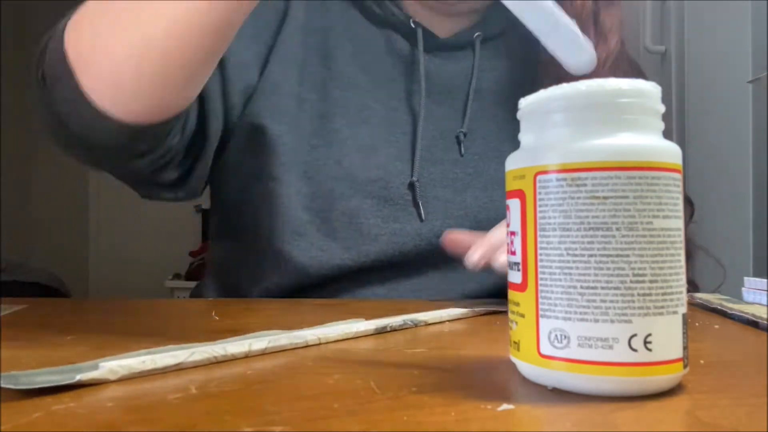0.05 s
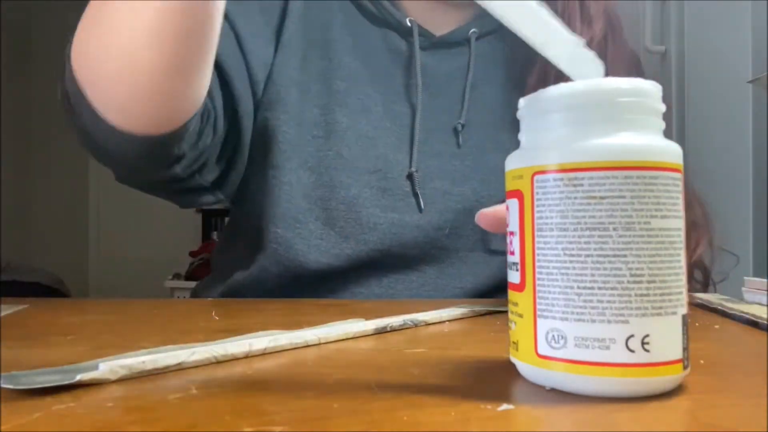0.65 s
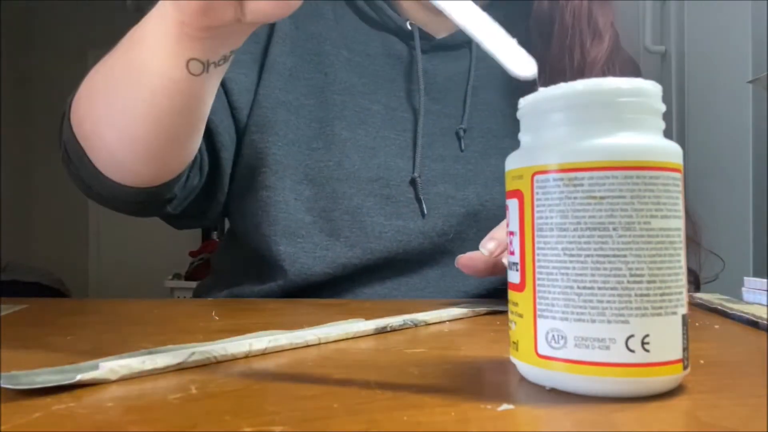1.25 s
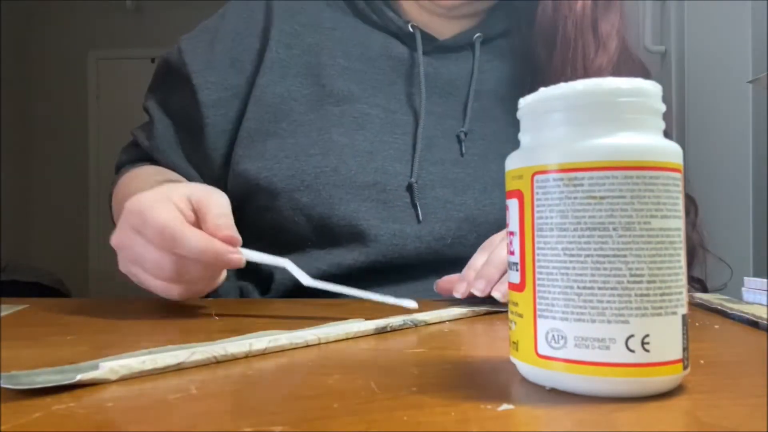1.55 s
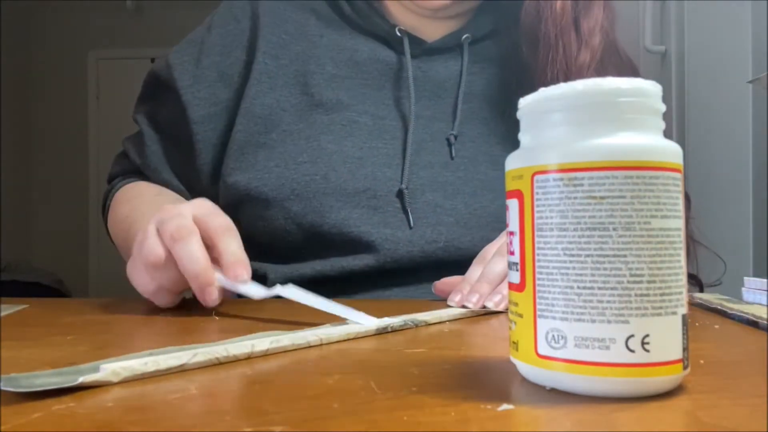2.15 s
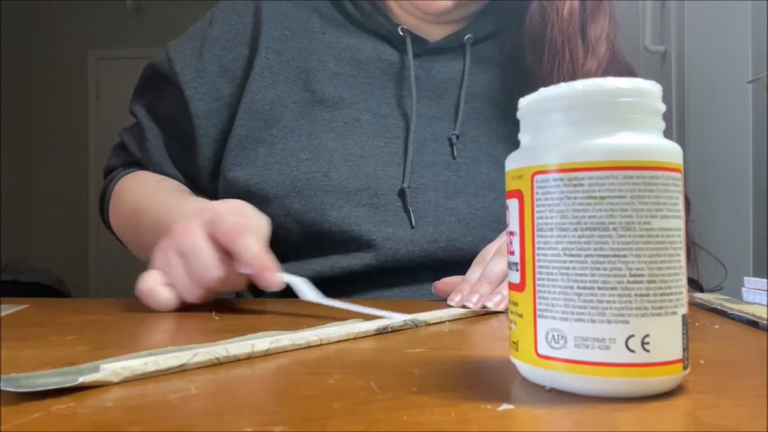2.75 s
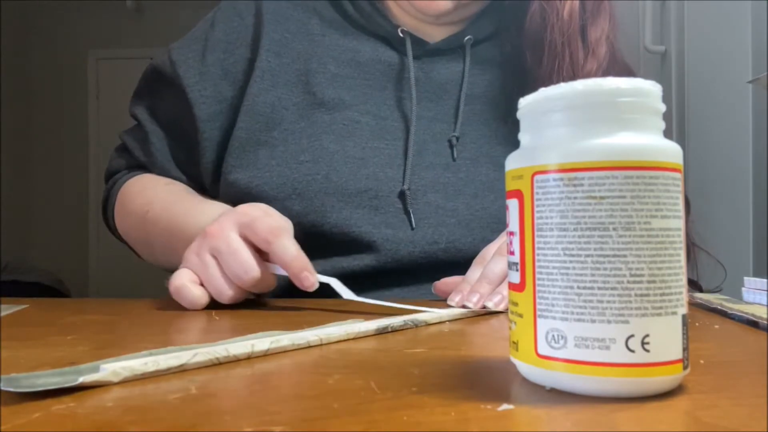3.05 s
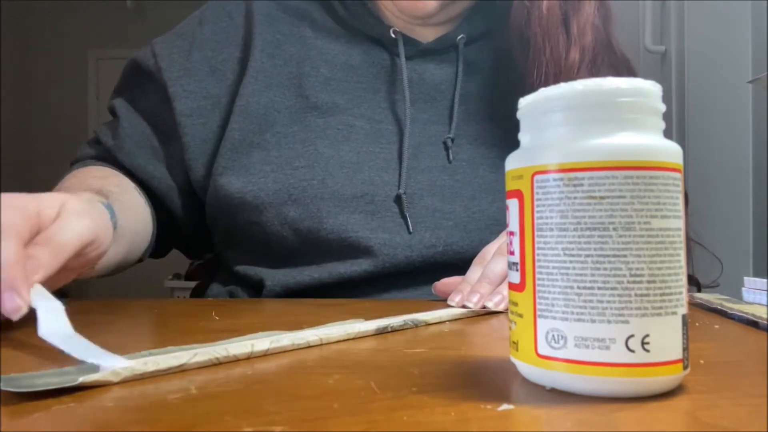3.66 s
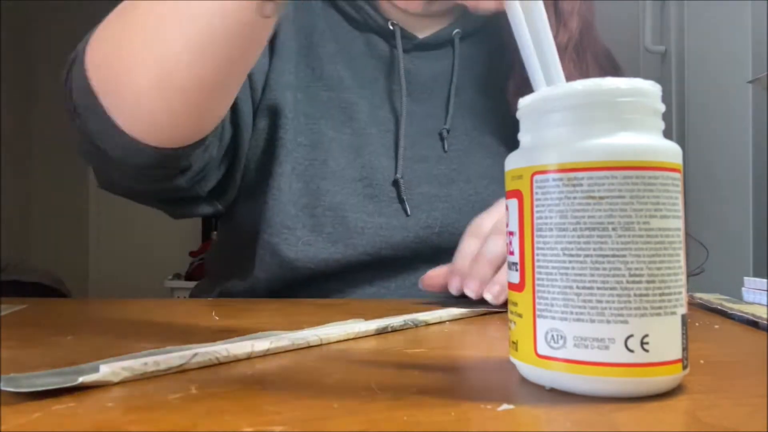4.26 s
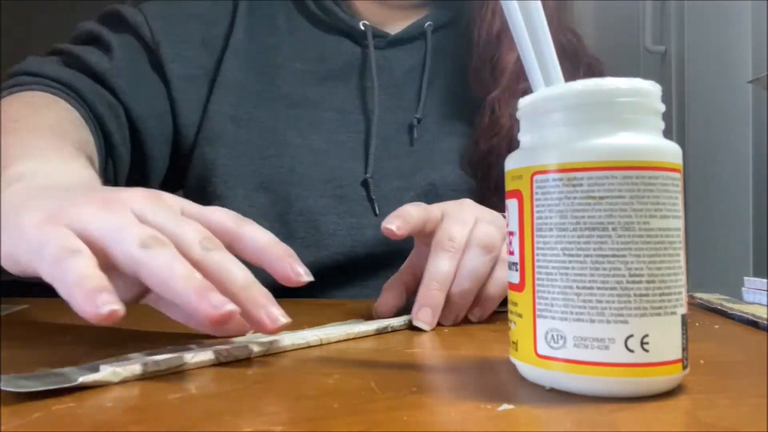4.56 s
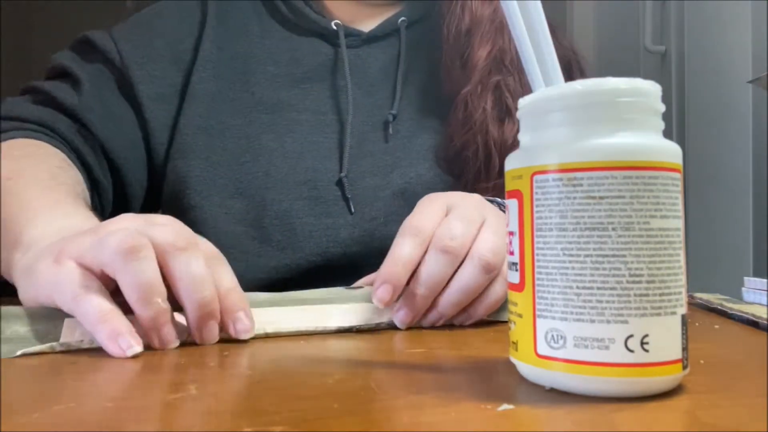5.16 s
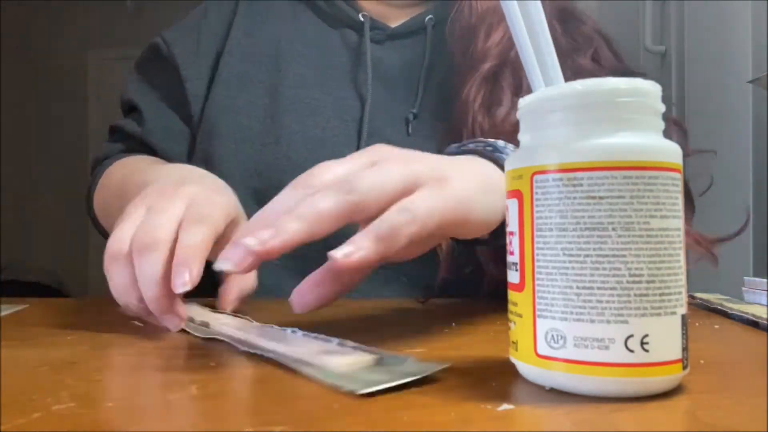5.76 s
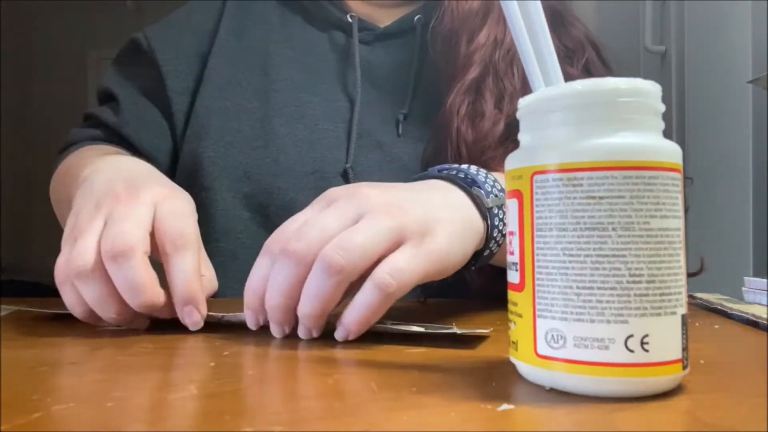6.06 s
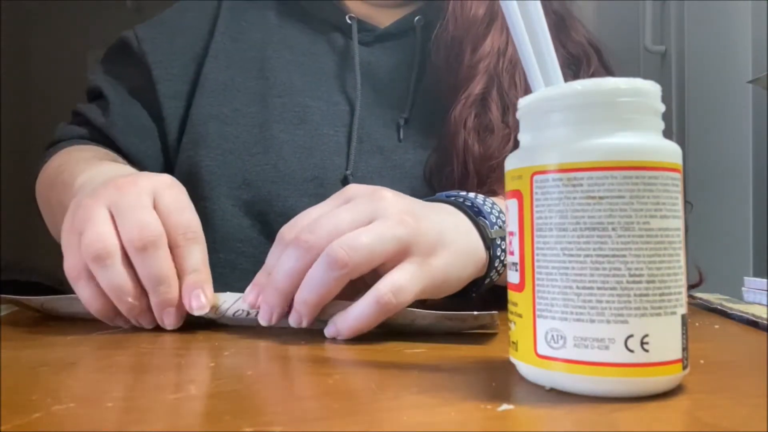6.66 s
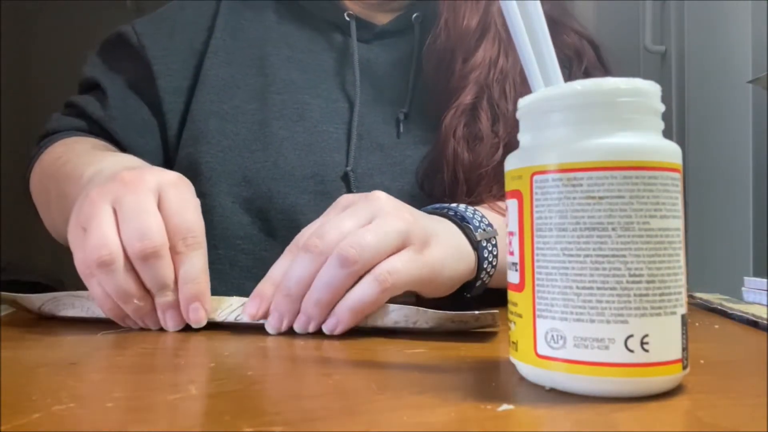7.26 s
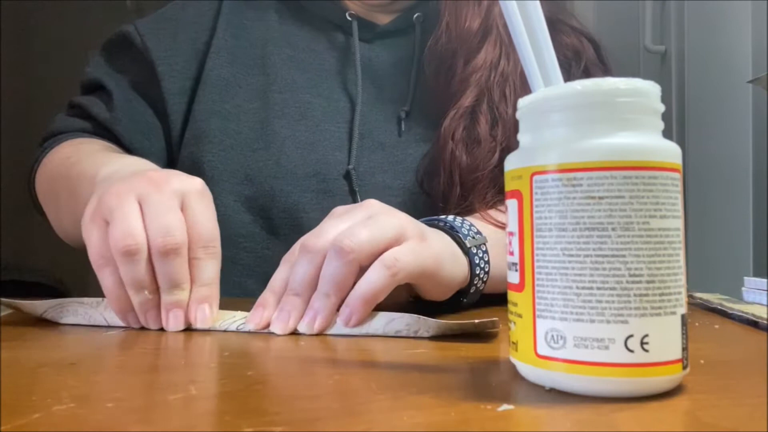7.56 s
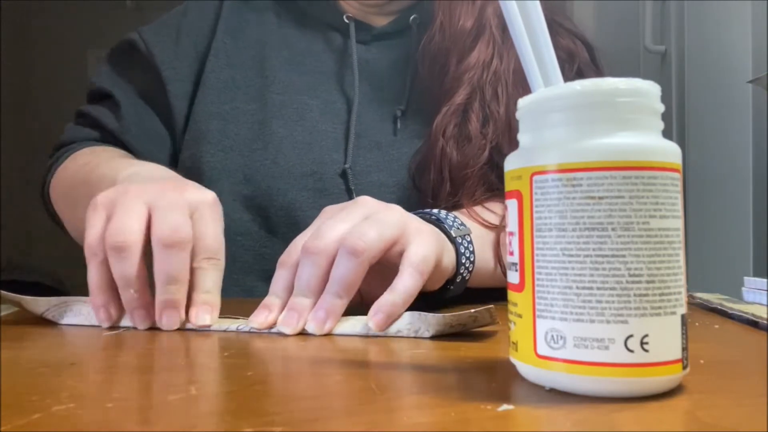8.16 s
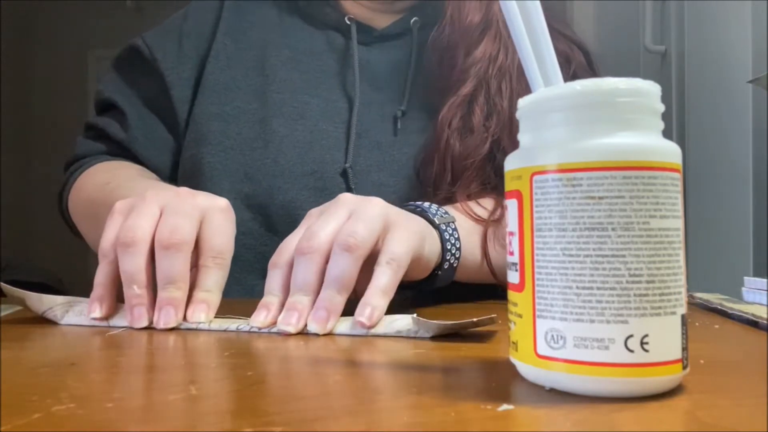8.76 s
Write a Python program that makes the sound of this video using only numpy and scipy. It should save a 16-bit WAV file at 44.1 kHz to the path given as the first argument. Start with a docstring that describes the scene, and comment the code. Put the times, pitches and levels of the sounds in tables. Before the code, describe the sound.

Small, close sounds at a table in a very quiet room with a faint low rumble. At about 0.4 seconds a spreader knocks lightly against a plastic glue jar, slightly to the right. From 2 to 4 seconds it dabs and scrapes along a wooden stick in a run of faint ticks and soft rubs. A louder cluster of jar knocks comes at about 4.2 seconds. From 4.6 seconds fingers handle the stick and press paper onto it, with soft table thuds, wooden taps, short crinkles and grainy, hissing rubs, busiest between 5 and 6.3 seconds. A faint low tone wavers from about 6.7 to 7.1 seconds. A firm thud lands at 7.3 seconds and a sharp tap, the most prominent, at 7.7. Dull presses and a crisp paper rustle follow around 8.4 to 8.6 seconds. Tiny, faint chirps ring now and then.

```python
"""At a table in a very quiet room, close up, glue is dabbed from a plastic jar onto a wooden stick, then paper
is pressed and smoothed onto it by hand. Each touch is a short grainy burst: tiny slips excite the normal modes
of the table top and of the stick or jar, and make the paper rasp and hiss. Every burst swells in and fades out
evenly. Between the touches the fingers keep rubbing. Faint chirps ring now and then, and a low tone wavers
briefly while the fingers press down."""
import sys
import numpy as np
from scipy import signal
from scipy.fft import rfft, irfft, next_fast_len
from scipy.io import wavfile

SR = 44100
rng = np.random.default_rng(int(sys.argv[2]) if len(sys.argv) > 2 else 0)


def generate_wav(signal):
    """Clip the signal to [-1, 1] and save it as 16-bit WAV at the path in sys.argv[1]."""
    frames = np.transpose(np.atleast_2d(signal))
    scaled = np.clip(frames, -1, 1) * 32767
    pcm = np.round(scaled).astype(np.int16)
    wavfile.write(sys.argv[1], SR, pcm)


N = 388962
TIME = np.arange(N) / SR
BODY_LEAD_S = 0.001   # thud and knock crest this long before the surface noise


def from_db(db):
    """Amplitude ratio of a level in decibels."""
    return np.exp(np.asarray(db) * (np.log(10) / 20))


def columns_at(rows, x):
    """Linear interpolation of each column against the first."""
    first, *columns = np.transpose(rows)
    return [np.interp(x, first, c) for c in columns]


def over_hz(rows, hz):
    """Interpolation of each column on a logarithmic frequency axis."""
    first, *columns = np.transpose(rows)
    return [np.interp(np.log(hz + 1), np.log(first), c) for c in columns]


def broad(spectrum):
    """Broadband response with a third-order roll-off below its lowest point."""
    return lambda hz: from_db(over_hz(spectrum, hz)[0]) * np.minimum(hz / spectrum[0][0], 1) ** 3


def ringing(modes, top_hz, scatter_db):
    """Modal superposition: each contact point weights the modes anew; soft skin mutes the top."""
    gains = from_db(np.array(modes)[:, 2] + scatter_db * rng.standard_normal(len(modes)))
    def response(hz):
        resonances = sum(gain * 1j * hz * width / (f * f - hz * hz + 1j * hz * width)
                         for (f, width, _), gain in zip(modes, gains))
        radiation = (hz / (modes[0][0] - modes[0][1])) ** 4   # weak below the lowest mode
        return resonances / np.sqrt(1 + (hz / top_hz) ** 12) * radiation / np.hypot(radiation, 1)
    return response


def stressed(response, centre_hz, lift_db, octaves):
    """Selective excitation: the place and hardness of a contact favour one frequency band."""
    return lambda hz: response(hz) * from_db(
        lift_db * np.exp(-(np.log2((hz + 1) / centre_hz) / octaves) ** 2))


def creased(response, ripple_db, count=170):
    """High modal density: a sheet's close resonances ripple its spectrum differently with each grip."""
    frequencies = np.geomspace(800, 16000, count)
    heights_db = ripple_db * rng.standard_normal(count)
    return lambda hz: response(hz) * from_db(np.interp(hz, frequencies, heights_db))


# Stereo image, by frequency:
# (frequency [Hz], coherence [0-1], phase lead of left [rad], left minus right [dB])
STEREO_IMAGE = [(88, 0.94, -0.3, 0), (140, 1, 2, 1), (260, 0.6, 0.82, -2), (445, 0.07, -0.24, -0.5),
                (666, 0.41, -1.5, -3.5), (916, 0, -1, -1.5), (1360, 0, 1.6, -0.5), (2600, 1, 0.5, 1.5),
                (4500, 0.6, 0.5, 1), (5740, 0.25, 2.5, -2.5), (7470, 0.88, -0.5, -0.5),
                (11200, 0.37, 4, 0.5), (12660, 0.92, 5.5, 0), (17100, 0.7, 13, -2)]

def in_stereo(force, response, lag_s=0, in_step_hz=250):
    """Partial coherence: two independent forces, filtered, form the sum and difference of the channels."""
    size = next_fast_len(force.shape[1])
    hz = np.arange(size // 2 + 1) * SR / size
    common, opposed = rfft(force, size) * response(hz)
    coherence, phase, pan_db = over_hz(STEREO_IMAGE, hz)
    coherence = np.clip(coherence, 0, .995)
    sides = np.array([[1], [-1]])
    pair = np.sqrt(1 + coherence) * common + sides * np.sqrt(1 - coherence) * opposed
    phase = phase * np.minimum(hz / in_step_hz, 1) ** 2   # left and right come into step in the bass
    left = np.exp(.5j * (phase - 2 * np.pi * hz * lag_s)) * from_db(pan_db / 2)
    return irfft(pair * np.array([left, 1 / left]), size)[:, :force.shape[1]]


def friction(envelope, response, lag_s=0, slips_per_s=900, slip_db=-2.5, smooth=0.32):
    """Stick-slip friction: fibres catch and let go over sliding noise; the envelope sets the energy."""
    shape = (2, len(envelope))
    sizes = from_db(slip_db * np.minimum(rng.exponential(1, shape[1]), 4))
    slips = (rng.random(shape[1]) < slips_per_s / SR) * sizes
    force = envelope * (slips + smooth) * rng.standard_normal(shape)
    sound = in_stereo(force, response, lag_s)
    return sound * np.sqrt(2 * np.sum(envelope ** 2) / (np.sum(sound ** 2) + 1e-30))


def add_burst(out, s, swell_s, db, response, lag_s=0, pan_db=0, crest_s=0.0018, size=8192):
    """Symmetric envelope: a short grainy burst fades in and out evenly around time s."""
    offset = np.arange(size) - size // 2
    envelope = from_db(db) * np.exp(-(np.hypot(offset / SR, crest_s) - crest_s) / max(swell_s, .002))
    sound = friction(envelope, response, lag_s) * from_db([[pan_db / 2], [-pan_db / 2]])
    at = offset + round(s * SR)
    inside = (at >= 0) & (at < N)
    out[:, at[inside]] += sound[:, inside]


# Spectrum of the room's background: (frequency [Hz], relative level [dB])
ROOM_SPECTRUM = [(20, -20), (40, -7.5), (62, 4.5), (100, -14.5), (160, -21.5), (250, -29), (500, -30),
                 (1000, -42.5), (3000, -45), (8000, -47.5), (15000, -49)]

def room(level_db=-69):
    """Ambient noise: a faint random rumble with most of its energy at low frequencies."""
    air = in_stereo(rng.standard_normal((2, N)), broad(ROOM_SPECTRUM))
    return from_db(level_db) * air / np.std(air)


# Spectrum of the rasp: (frequency [Hz], relative level [dB])
RASP_SPECTRUM = [(900, -36.5), (1300, -5.5), (1700, 1), (2400, -1.5), (3200, -1), (4100, -8.5),
                 (5500, -31.5)]

def rasping(centre_hz, ripple_db, lift_db, octaves):
    """Mid-band friction response: the surface's dense resonances, lifted around one frequency."""
    return stressed(creased(broad(RASP_SPECTRUM), ripple_db), centre_hz, lift_db, octaves)


# Spectrum of the hiss: (frequency [Hz], relative level [dB])
HISS_SPECTRUM = [(3000, -14.5), (4300, -2.5), (5300, -2.5), (6300, -1.5), (8000, -3.5), (9500, -5.5),
                 (12500, -7.5), (15000, -10), (16000, -38.5)]

def hissing(s, dull_db, ripple_db, duller_from_s=3.8):
    """High-band friction response: the hiss has less top treble from duller_from_s on."""
    crisp_db = 1.5 if s < duller_from_s else -2.5
    return stressed(creased(broad(HISS_SPECTRUM), ripple_db), 15200, crisp_db - dull_db, octaves=0.35)


# Rumble of the table under leaning arms: (time [s], level [dB])
LEANING = [(0, -85), (0.28, -73.5), (0.7, -79.5), (1.7, -86.5), (2.14, -66.5), (2.34, -84.5), (2.85, -69),
           (3.1, -82), (3.6, -67.5), (4.47, -90), (4.95, -54.5), (5.4, -69), (5.95, -48), (6.5, -73.5),
           (7.2, -62.5), (7.95, -60.5), (8.36, -44.5), (8.54, -64), (8.82, -66)]
# Sliding strokes: (start [s], end [s], rasp level at start [dB], rasp level at end [dB],
# stick level re rasp [dB], hiss level re rasp [dB])
STROKES = [(0.14, 0.34, -94.5, -94.5, 16.5, 6), (0.50, 0.622, -114, -100, 7, 18.5),
           (1.45, 1.542, -83, -92, 0.5, 2.5), (1.71, 1.776, -94.5, -89, 17, 7.5),
           (2.484, 2.526, -75, -74, 9.5, -1.5), (2.75, 2.918, -83, -73.5, 11.5, 2.5),
           (3.366, 3.61, -90, -90, 17.5, -5), (3.714, 3.946, -84, -89, 9, -10),
           (4.254, 4.381, -81.5, -99.5, 27.5, 5.5), (4.567, 4.805, -71.5, -76, 15, 2.5),
           (4.858, 5.045, -59.5, -71.5, 5, -2.5), (5.082, 5.227, -66.5, -65, 9, -6),
           (5.33, 5.508, -58.5, -59, 6.5, -3.5), (5.496, 5.61, -65, -64.5, 13, 3.5),
           (5.66, 5.73, -77, -80, 13, -4), (5.763, 6.034, -61, -57, 3.5, 0.5),
           (6.082, 6.362, -67.5, -66, 10, -5), (6.417, 6.485, -67, -71, 3.5, -9),
           (6.513, 6.584, -53.5, -55.5, -9.5, -10), (6.642, 6.742, -65.5, -82, 9.5, -8),
           (6.87, 7.114, -90.5, -76.5, 1, -6.5), (7.209, 7.329, -69.5, -70.5, 3, -3.5),
           (7.54, 7.661, -91.5, -66.5, 11.5, 0), (7.805, 7.923, -82.5, -85.5, 17, 0),
           (8.052, 8.404, -77.5, -58.5, 10.5, 2.5), (8.552, 8.658, -73, -75.5, 15.5, 3),
           (8.77, 8.82, -83, -69.5, 2.5, -3.5)]

def stroke_drive(attack_s=0.017, release_s=0.024, uneven_db=1.5, uneven_per_s=38, count=4000):
    """Incoherent addition: leaning and strokes sum in power to drive table, stick, rasp and hiss."""
    t = np.linspace(0, TIME[-1], count)
    lean_db, = columns_at(LEANING, t)
    power = np.zeros((4, count))
    power[:2] = from_db([lean_db, lean_db - 12.5]) ** 2   # the table passes a share on to the stick
    for start, end, first_db, last_db, stick_db, hiss_db in STROKES:
        gate = np.exp(-np.maximum(start - t, 0) / attack_s - np.maximum(t - end, 0) / release_s)
        effort = gate * from_db(np.interp(t, [start, end], [first_db, last_db]))
        table_db = stick_db + 1.5
        power += np.outer(from_db([table_db, stick_db, 0, hiss_db]), effort) ** 2
    # the sliding grip keeps catching and easing
    grip_db = uneven_db * np.interp(t * uneven_per_s, np.arange(count), rng.standard_normal(count))
    return np.array([np.interp(TIME, t, from_db(grip_db) * np.sqrt(p)) for p in power])


# Normal modes of the table top and of the stick: (frequency [Hz], bandwidth [Hz], relative level [dB])
TABLE_MODES = [(76.9, 27, 10), (101.6, 15, 10), (120.8, 33, 10.5), (159, 44, -35)]
STICK_MODES = [(246.2, 22.2, 6), (346.8, 67, -3), (438, 27.7, -2.5), (553, 42, -9.5), (627, 24.5, -6.5),
               (762, 16.6, -10), (856, 51, -12), (918, 20, -16.5), (1080.5, 41, -11.5), (1327, 87, -19),
               (1452, 16, -18.5)]
# Centre of the rasp, set by the length of surface free to move: (time [s], frequency [Hz])
RASP_CENTRE = [(0.4, 2210), (2.5, 2100), (2.88, 1690), (3.2, 1690), (3.55, 2340), (3.72, 1750),
               (4.17, 2360), (4.57, 2270), (5.05, 2630), (5.59, 2170), (5.87, 2800), (6.07, 2070),
               (6.25, 2450), (6.7, 2480), (7.43, 2280), (8.12, 2010), (8.45, 2330), (8.65, 3000)]

def rubbing(wander_s=.00006, size=8192):
    """Forced vibration: sliding fingers and spreader drive table, stick and paper, grip after grip."""
    out = np.zeros((2, N + size))
    drives = np.pad(stroke_drive(), ((0, 0), (0, size)))
    blend = np.sin(np.pi * np.arange(size) / size)   # overlapping grips cross-fade at equal power
    for start in range(0, N, size // 2):
        grip = slice(start, start + size)
        place_s = wander_s * rng.standard_normal()
        s = (start + size / 2) / SR
        rasp_hz, = columns_at(RASP_CENTRE, s)
        table = ringing(TABLE_MODES, top_hz=178.5, scatter_db=4.5)
        stick = ringing(STICK_MODES, top_hz=1350, scatter_db=5.0)
        rasp = rasping(rasp_hz, ripple_db=4.0, lift_db=6.5, octaves=0.25)
        hiss = hissing(s, dull_db=0, ripple_db=4.5)
        for drive, path, lag_s in zip(drives, (table, stick, rasp, hiss), (0, place_s, place_s, 0)):
            envelope = blend * drive[grip]
            out[:, grip] += friction(envelope, path, lag_s, slips_per_s=400, slip_db=3.5, smooth=0.4)
    return out[:, :N]


# Crisp rustles of paper and cloth:
# (time [s], swell time [s], rasp level [dB], hiss level re rasp [dB], rasp centre [Hz])
CRINKLES = [(0.111, 0.022, -80, 11, 2980), (2.315, .015, -94, 11.5, 3580), (4.661, 0.012, -63.5, -1, 1600),
            (4.785, 0.025, -60, 0.5, 2280), (5.204, 0.012, -45.5, -4, 2700),
            (5.36, 0.0085, -43.5, -11.5, 3380), (6.147, 0.0094, -54.5, -2.5, 2830),
            (6.277, .018, -41.5, -11.5, 2630), (6.646, 0.021, -58.5, -2, 2970),
            (6.734, 0.029, -65, 0, 2940), (7.082, .01, -76.5, 14.5, 2816),
            (7.308, 0.0077, -56.5, -10, 3020), (7.401, 0.016, -66.5, -8, 2890),
            (7.484, 0.028, -59.5, -1, 1950), (7.979, 0.017, -74.5, -1, 3180),
            (8.405, 0.021, -56.5, -23, 2260), (8.568, 0.026, -49.5, 5, 3700),
            (8.609, 0.011, -49.5, 6, 3440), (8.74, 0.012, -71.5, 6, 3580)]

def crinkles(wander_s=.00005):
    """Release of strain: fibres give way with a pitched rasp and a hiss, and lightly ring the stick."""
    out = np.zeros((2, N))
    for s, swell_s, db, hiss_db, rasp_hz in CRINKLES:
        place_s = wander_s * rng.standard_normal()
        rasp = rasping(rasp_hz, ripple_db=2.5, lift_db=6.0, octaves=0.12)
        hiss = stressed(creased(broad(HISS_SPECTRUM), ripple_db=6.0), 12200, lift_db=1.0, octaves=0.6)
        stick = ringing(STICK_MODES, top_hz=1430, scatter_db=2.0)
        knock = stressed(stick, 1300, lift_db=1.0, octaves=0.81)
        add_burst(out, s, swell_s, db, rasp, place_s)
        add_burst(out, s, swell_s, db + hiss_db, hiss)
        add_burst(out, s - BODY_LEAD_S, swell_s * 0.58, db - 1.5, knock, place_s)
    return out


def knocks(rows, modes, lag_s, hiss_db, pan_db, lift_db, wander_s=.00005):
    """Impact excitation: each tap thuds in the table, knocks in the object and scuffs its surface."""
    out = np.zeros((2, N))
    for s, swell_s, db, thud_db, rasp_db, knock_hz in rows:
        place_s = lag_s + wander_s * rng.standard_normal()   # no two taps land on the same spot
        rasp_hz, = columns_at(RASP_CENTRE, s)
        thud = ringing(TABLE_MODES, top_hz=172.0, scatter_db=8.0)
        knock = stressed(ringing(modes, top_hz=1500, scatter_db=1.0), knock_hz, lift_db, octaves=0.35)
        rasp = rasping(rasp_hz, ripple_db=3.5, lift_db=lift_db, octaves=0.34)
        hiss = hissing(s, dull_db=0.2 * (db + 74), ripple_db=3.5)   # a firmer tap has less top treble
        add_burst(out, s - BODY_LEAD_S, swell_s * .5, db + thud_db, thud)
        add_burst(out, s - BODY_LEAD_S, swell_s * 0.84, db, knock, place_s, pan_db)
        add_burst(out, s, swell_s, db + rasp_db, rasp, place_s)
        add_burst(out, s, swell_s, db + rasp_db + hiss_db, hiss)
    return out


# Taps on the stick: (time [s], swell time [s], knock level [dB], thud level re knock [dB],
# rasp level re knock [dB], knock centre [Hz])
STICK_TAPS = [(0.112, .017, -61.5, -2.5, -17, 386), (1.992, 0.014, -59.5, 9, -18.5, 260),
              (2.108, 0.012, -65.5, 8, -10.5, 684), (2.185, 0.01, -63.5, 4, -15.5, 900),
              (2.44, 0.01, -50, -3.5, -20, 257), (2.47, 0.018, -66.5, -12, 3.5, 800),
              (2.547, 0.016, -56.5, -6, -11.5, 530), (2.655, .016, -60.5, -7, -11.5, 1290),
              (2.755, 0.038, -58.5, -7, -7, 660), (2.863, 0.021, -54, -2, -20, 626),
              (3.084, 0.015, -67, 3.5, -13, 720), (3.145, .006, -63, -3, -27, 475),
              (3.223, .015, -60.5, -11, -14.5, 1220), (3.341, .0175, -53.5, 8.5, -4, 544),
              (3.555, 0.014, -52, 1.5, -5.5, 1170), (3.605, 0.016, -55.5, -5, -16, 510),
              (3.665, 0.015, -58, -11, -25, 457), (3.727, 0.0095, -53, -2.5, -23.5, 239),
              (3.782, 0.019, -55.5, -8, -24, 400), (3.837, .012, -54.5, -6, -19, 620),
              (3.895, 0.01, -55, -15, -15.5, 626), (3.928, 0.011, -48.5, 6, -23, 250),
              (5.336, 0.02, -43.5, 5, -6, 990), (5.52, 0.016, -39.5, 6, -16, 890),
              (6.01, 0.011, -35.5, 6, -11, 1000), (6.048, 0.041, -35, -2, -18.5, 261),
              (6.274, 0.016, -38, -4, -11, 370), (7.261, 0.0082, -40.5, -24, -19, 312),
              (7.7, 0.01, -23.5, 2, -18.5, 800)]

def stick_taps():
    """Resonance of a bar: spreader or fingers tap the wooden stick, which lies in the middle."""
    return knocks(STICK_TAPS, STICK_MODES, lag_s=0, hiss_db=-2.5, pan_db=-0.5, lift_db=8.0)


# Normal modes of the jar: (frequency [Hz], bandwidth [Hz], relative level [dB])
JAR_MODES = [(252.4, 42, -4), (404, 66, -6.5), (584.3, 32, -0.5), (780, 25, -13), (860, 6.3, -32.5),
             (1200, 35, -24)]
# Spreader against the jar: (time [s], swell time [s], knock level [dB], thud level re knock [dB],
# rasp level re knock [dB], knock centre [Hz])
JAR_KNOCKS = [(0.397, 0.0093, -37, -4.5, -20.5, 640), (0.42, 0.022, -46, -0.5, -10, 484),
              (0.47, 0.028, -58, 9.5, -16, 251), (1.293, 0.02, -57.5, 2.5, -21.5, 250),
              (4.137, 0.0093, -40.5, -8, -13, 420), (4.173, 0.013, -29, -11, -22, 600),
              (4.215, .026, -42.5, -2.5, -22, 573), (4.285, 0.023, -50.5, 3, -32, 620),
              (4.33, 0.0069, -46.5, 1, -40, 640)]

def jar_knocks():
    """Resonance of a shell: the jar rings on the right; smooth plastic hisses far less than it rasps."""
    return knocks(JAR_KNOCKS, JAR_MODES, lag_s=0.00026, hiss_db=-16, pan_db=-1, lift_db=10.0)


# Spectrum of a chirp: (frequency [Hz], relative level [dB])
CHIRP_SPECTRUM = [(500, 2), (1300, -13), (1800, -4), (2200, 0.5), (2800, -7.5), (4000, -19.5), (8000, -25),
                  (15000, -59)]
# Small ringing chirps: (time [s], swell time [s], level [dB], centre frequency [Hz])
CHIRPS = [(0.478, 0.015, -61, 2030), (0.981, 0.011, -59, 2080), (1.489, 0.013, -69.5, 2080),
          (2.98, 0.022, -77.5, 2170), (3.476, 0.0083, -58.5, 2040), (4.477, 0.011, -61.5, 1910),
          (6.983, 0.016, -61, 1980)]

def chirps():
    """Narrow-band noise: faint, short chirps ring near two kilohertz."""
    out = np.zeros((2, N))
    for s, swell_s, db, centre_hz in CHIRPS:
        colour = creased(broad(CHIRP_SPECTRUM), ripple_db=3.5)
        add_burst(out, s, swell_s, db, stressed(colour, centre_hz, lift_db=10.0, octaves=0.11))
    return out


# Fingertips pressing down: (time [s], swell time [s], thud level [dB], knock level re thud [dB])
PRESSES = [(4.614, 0.012, -32.5, -12), (4.669, 0.016, -51, -1.5), (4.998, 0.022, -41.5, -9.5),
           (5.288, 0.024, -46, 2), (5.611, 0.018, -41, -7), (5.775, 0.035, -36, -3),
           (5.842, 0.021, -35.5, -12.5), (6.146, 0.017, -36.5, -9.5), (6.735, 0.017, -45, -7),
           (6.86, 0.013, -47, -20), (7.073, 0.016, -50, -11), (7.116, 0.016, -47.5, -9.5),
           (7.271, 0.0048, -23.5, -22), (7.307, 0.012, -42.5, -13), (8.355, 0.026, -30, -17.5),
           (8.425, 0.017, -28.5, -17), (8.579, 0.031, -44.5, -10)]

def presses(centre_hz=280, wander_s=.00005):
    """Compliant contact: a soft fingertip thuds in the table and stirs mostly the stick's low modes."""
    out = np.zeros((2, N))
    for s, swell_s, db, knock_db in PRESSES:
        stick = ringing(STICK_MODES, top_hz=1330, scatter_db=7.5)
        knock = stressed(stick, centre_hz, lift_db=5.0, octaves=0.48)
        thud = ringing(TABLE_MODES, top_hz=175.0, scatter_db=-3.0)
        add_burst(out, s - BODY_LEAD_S, swell_s * .5, db, thud)
        place_s = wander_s * rng.standard_normal()
        add_burst(out, s - BODY_LEAD_S, swell_s * 0.75, db + knock_db, knock, place_s)
    return out


# Low tone while the fingers press down: (time [s], frequency [Hz], level [dB])
DRONE = [(6.6, 86.7, -72), (6.72, 86.2, -50.5), (6.9, 86.9, -53), (7.1, 86.6, -48), (7.17, 89, -83)]

def drone(waver=0.0295, count=110):
    """Random frequency modulation: a low sinusoid wavers in pitch."""
    hz, db = columns_at(DRONE, TIME)
    wander = np.interp(TIME, np.linspace(0, TIME[-1], count), rng.standard_normal(count))
    phase = 2 * np.pi * np.cumsum(hz * (1 + waver * wander)) / SR
    sounding = (TIME > DRONE[0][0]) & (TIME < DRONE[-1][0])
    return sounding * from_db(db) * np.sin(phase)


def scene():
    """Linear superposition: brief bursts and sustained sounds add."""
    bursts = jar_knocks() + stick_taps() + presses() + crinkles() + chirps()
    return bursts + rubbing() + drone() + room()


def record(dry, notch_hz=10580, notch_db=-13, notch_width_hz=480, cutoff_hz=15500):
    """Linear filtering: the microphone ports notch the treble, and a steep low-pass cuts the top."""
    hz = np.arange(N // 2 + 1) * SR / N
    ports = from_db(notch_db * np.exp(-((hz - notch_hz) / notch_width_hz) ** 2))
    low_pass = signal.ellip(12, .1, 80, cutoff_hz, fs=SR, output="sos")
    return signal.sosfilt(low_pass, irfft(rfft(dry) * ports, N))


dry = scene()
out = record(dry)
generate_wav(out)
```